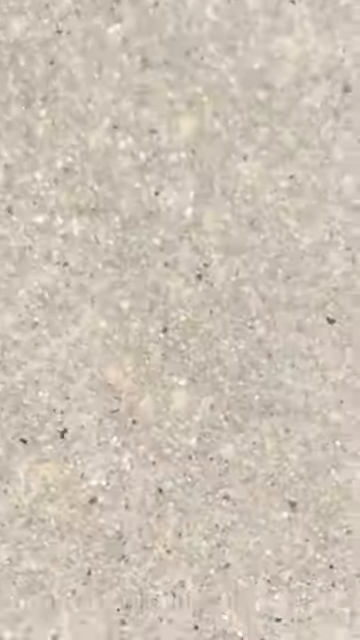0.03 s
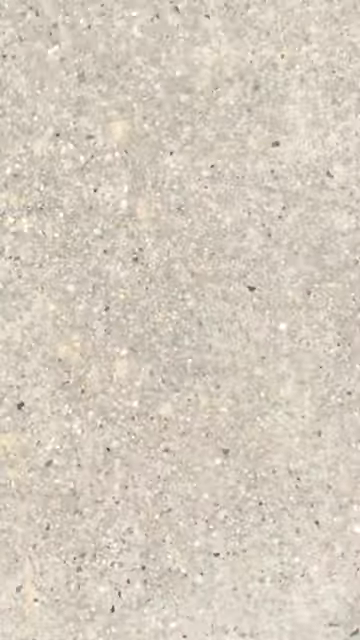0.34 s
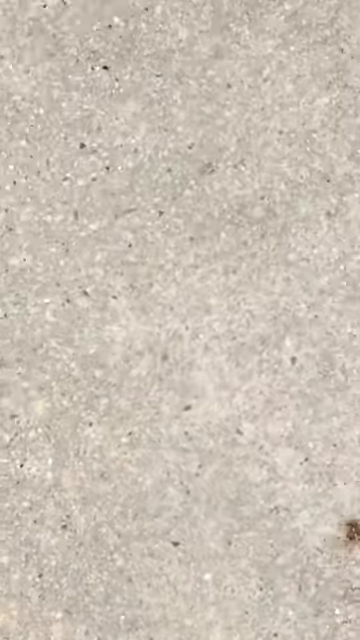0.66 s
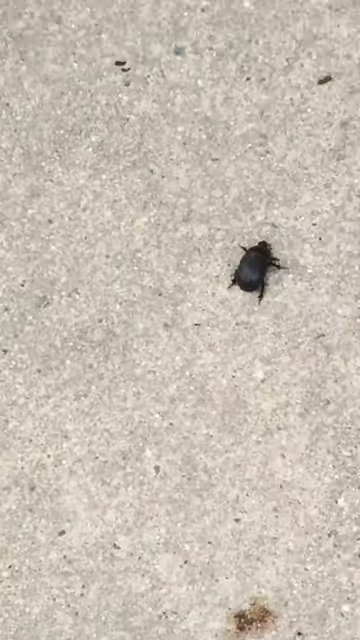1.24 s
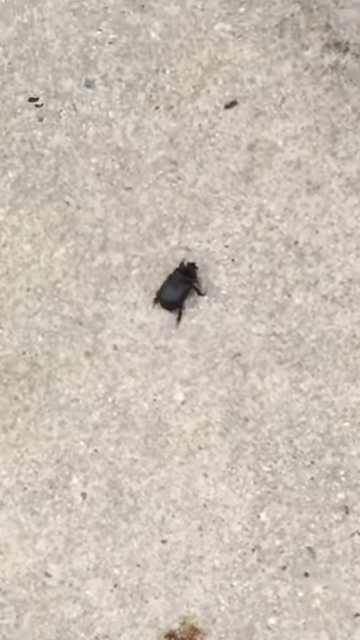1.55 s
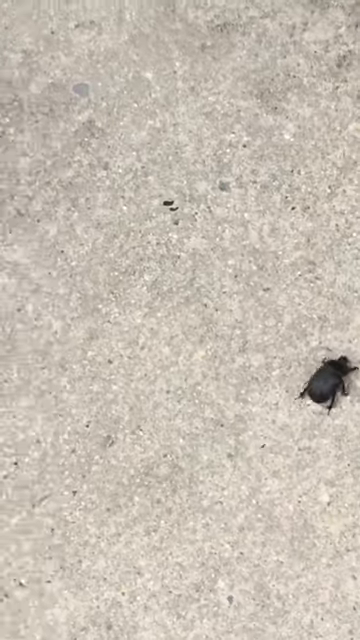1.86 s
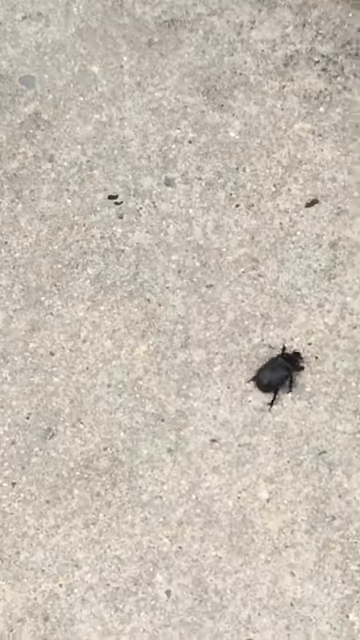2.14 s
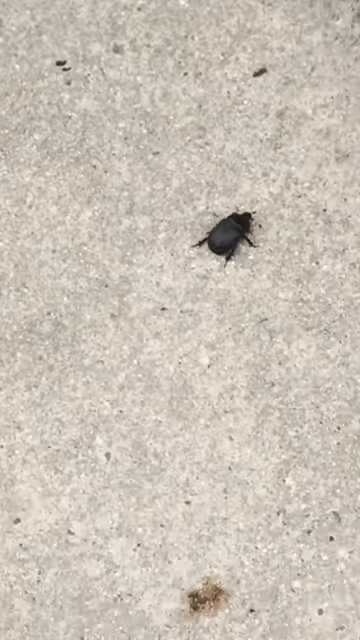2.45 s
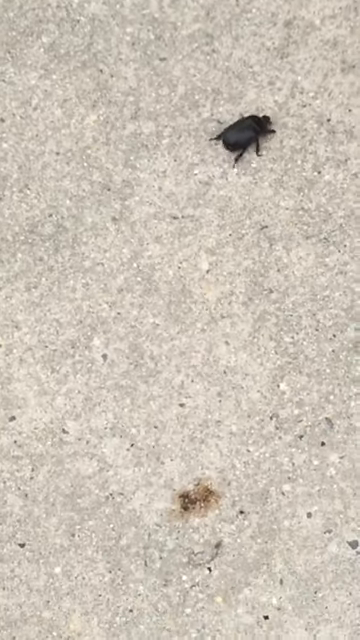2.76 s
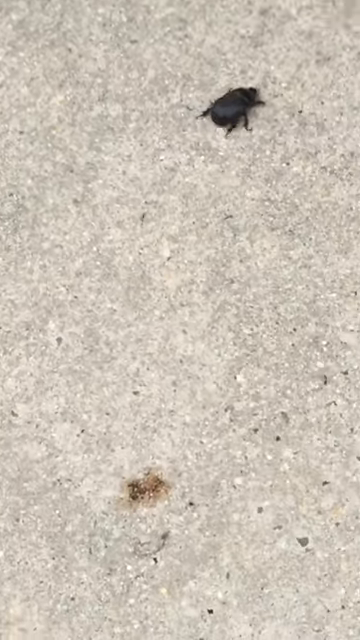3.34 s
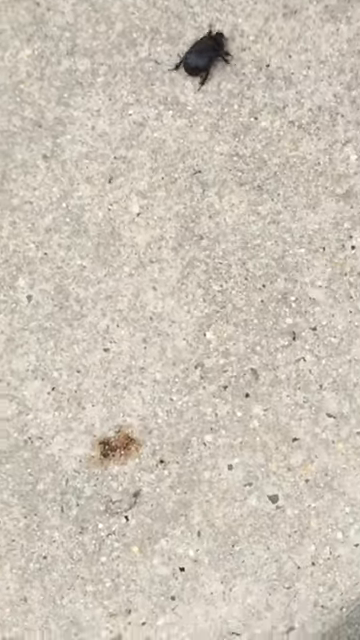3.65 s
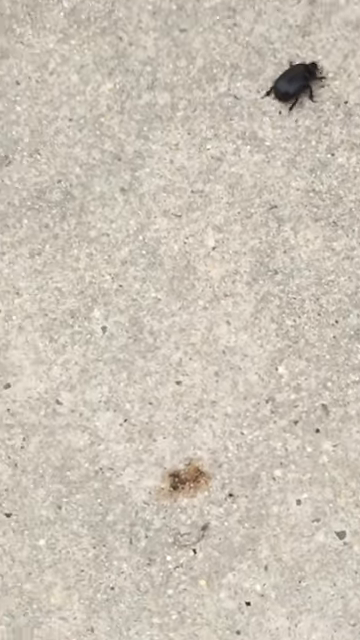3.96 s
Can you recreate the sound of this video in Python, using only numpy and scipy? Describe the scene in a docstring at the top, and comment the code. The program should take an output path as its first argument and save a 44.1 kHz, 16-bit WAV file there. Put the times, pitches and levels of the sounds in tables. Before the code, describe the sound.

A steady high insect hiss with low rumble, light microphone handling and a faint bird.

```python
"""Outdoors over a pavement, air rumbles, far machines throb (probably an idling engine and a compressor)
and a chorus of insects hisses near 6.6 kHz throughout. At the start a hand rubs and bumps the camera
while a bird whistles faintly. A few nearer insects chirp above the chorus, loudest around 2.3 s, and a
far bird peeps at 1.5 and 2.2 s. From 2.4 s the first bird twitters and whistles in turn, as the hand
rubs lightly and makes two more dry bumps, at 2.5 and 3.6 s."""
import sys
import numpy as np
from scipy import signal
from scipy.fft import rfft, irfft, next_fast_len
from scipy.io import wavfile
from scipy.ndimage import uniform_filter1d, map_coordinates

SR = 44100
rng = np.random.default_rng(int(sys.argv[2]) if len(sys.argv) > 2 else 0)


def dump(signal):
    """Clip the signal to [-1, 1] and save it as 16-bit WAV at the path in sys.argv[1]."""
    limited = np.clip(np.atleast_2d(signal).T, -1, 1)
    pcm = np.round(limited * 32767).astype(np.int16)
    wavfile.write(sys.argv[1], SR, pcm)


N = 176400
T = np.arange(N) / SR


def amp(db):
    """Turn decibels into a gain to multiply by."""
    return 10 ** (np.asarray(db) / 20)


def unit(x):
    """Scale x to an average (rms) strength of 1."""
    return x / np.sqrt(np.mean(x ** 2) + 1e-20)


def wobble(rate):
    """A smooth curve through `rate` random points a second."""
    points = rng.standard_normal(int(N * rate / SR) + 4)
    return map_coordinates(points, [T * rate], mode="nearest")


def filtered(x, response):
    """Turn each frequency in x up or down by the gain response(hz)."""
    size = next_fast_len(N + 8192)
    return irfft(rfft(x, size) * response(np.fft.rfftfreq(size, 1 / SR)), size)[:N]


def noise(spectrum, patchy_db):
    """Noise of strength 1, shaped by a spectrum, with random louder and softer patches."""
    cells = signal.stft(rng.standard_normal(N), nperseg=512)[2]
    patches = uniform_filter1d(rng.standard_normal(cells.shape), size=5, axis=0)  # smooth over pitch
    patches = uniform_filter1d(patches, size=12, axis=1)  # and over time
    patchy = signal.istft(cells * amp(patchy_db * unit(patches)), nperseg=512)[1][:N]
    f, db = np.transpose(spectrum)
    return unit(filtered(patchy, lambda hz: amp(np.interp(np.log(hz + 1), np.log(f), db))))


def add(track, s, x):
    """Mix x into the track, starting at s seconds."""
    i = max(0, round(s * SR))
    track[i:i + len(x)] += x[:max(0, N - i)]


def outdoors(x, echo_db, t60):
    """Add scattered echoes from trees and walls that fade by 60 dB in t60 seconds."""
    t = T[:SR // 2]
    tail = rng.standard_normal(len(t)) * amp(-60 * t / t60) * (1 - np.exp(-t / 0.021))
    return x + amp(echo_db) * signal.fftconvolve(x, tail / np.linalg.norm(tail))[:N]


def air():
    """The open air makes a low, nearly steady rumble."""
    # tone of the air: f/Hz, relative level/dB
    spectrum = [(15, -85), (30, -77), (55, -66.5), (90, -63), (125, -63.5), (160, -72), (220, -73),
                (275, -76.5), (345, -74.5), (440, -82.5), (620, -81.5), (800, -80), (900, -85.5),
                (1000, -84), (1170, -88.5), (1430, -86.5), (1700, -91), (2400, -95.5), (4000, -103.5),
                (5600, -106.5), (8000, -108), (9600, -113), (13500, -115), (15300, -119)]
    return amp(-42.5 + 0.39 * wobble(2.75)) * noise(spectrum, patchy_db=1.5)


def hum(hz, tones, drift, flutter_db):
    """Tones at whole multiples of one slightly unsteady rate, each wavering in level."""
    phase = 2 * np.pi * np.cumsum(hz * (1 + drift * wobble(1.995))) / SR
    out = np.zeros(N)
    for multiple, db in tones:
        level = np.sqrt(2) * amp(db + flutter_db * wobble(4.966))
        out += level * np.sin(round(multiple) * phase + rng.uniform(0, 2 * np.pi))
    return out


def machines():
    """A far engine and a compressor throb, their tones beating against each other."""
    # engine tones: multiple of the turning speed, level/dB
    engine = [(4, -54), (5, -41), (6, -49), (7, -52)]
    # compressor tones: multiple of the turning speed, level/dB
    compressor = [(4, -61), (6, -64), (8, -70.5), (14, -66.5), (18, -67), (24, -71.5)]
    compressor_hum = [(1, -50)]  # a further compressor tone near 119 Hz, same columns
    return (hum(17.5, engine, drift=0.00413, flutter_db=1.5)
            + hum(58.54, compressor, drift=0.001, flutter_db=3.5)
            + hum(119.3, compressor_hum, drift=0.001, flutter_db=3.5))


def insect_chorus():
    """Many far insects blend into one high hiss."""
    # tone of the chorus: f/Hz, relative level/dB
    spectrum = [(4500, -58), (5700, -18), (6050, -6), (6400, 3.5), (6850, 2.5), (7300, -3.5), (7800, -13.5),
                (8800, -15.5), (9500, -34), (12000, -63)]
    return amp(-62 + 1.2 * wobble(24.44)) * noise(spectrum, patchy_db=1.13)


def rub(strokes, spectrum, grain_db):
    """Friction makes grainy noise that rises and dies away with each stroke."""
    level = np.zeros(N)
    for s, rise, fall, db in strokes:
        fade = np.exp(-np.maximum(T - s - rise, 0) / fall)
        level += amp(db) * np.clip((T - s) / rise, 0, 1) * fade
    return level * unit(noise(spectrum, patchy_db=1.4) * amp(grain_db * wobble(500)))


def hand_rubbing():
    """The hand rubs the camera in four ways, each with its own tone."""
    # rasping rubs, rumbling hand shifts, dull grip scuffs, light skin brushes:
    # t/s, rise/s, fall/s, level/dB
    rasps = [(0, .004, .026, -33.5), (.528, .012, .03, -60), (1.17, .012, .035, -61), (2.83, .07, .12, -66)]
    shifts = [(.02, 0.042, 0.13, -50.5), (2.0, 0.088, 0.22, -55), (2.62, 0.13, 0.21, -49.5),
              (3.1, 0.1, 0.57, -54)]
    scuffs = [(.042, 0.0033, 0.014, -39.5), (2.66, 0.03, .1, -60), (2.78, 0.0073, .01, -52)]
    brushes = [(.83, .03, .03, -66), (2.02, 0.004, .012, -59), (2.13, 0.0081, .02, -68),
               (2.51, 0.076, .16, -62), (2.785, .01, 0.018, -67), (3.415, 0.0095, 0.017, -63)]
    # tone of each kind: f/Hz, relative level/dB
    rasp_tone = [(300, -20), (1000, -10), (2000, -15), (2900, -12), (3600, -3), (4350, 1), (5100, -6),
                 (6200, -20), (10000, -26), (15000, -33)]
    shift_tone = [(40, -28), (110, -18.5), (210, 0), (340, -3.5), (550, -21), (2000, -47)]
    scuff_tone = [(100, -37), (220, 4), (450, -14.5), (1000, 1), (2000, -13), (5000, -16.5), (15000, -28.5)]
    brush_tone = [(500, -8), (3000, 3), (7000, 2), (12500, -1), (15000, -4)]
    return (rub(rasps, rasp_tone, grain_db=1) + rub(shifts, shift_tone, grain_db=0.5)
            + rub(scuffs, scuff_tone, grain_db=3.5) + rub(brushes, brush_tone, grain_db=1))


def sing(notes, calls):
    """A bird's pure notes each swell and fade while the pitch slides along a curve."""
    out = np.zeros(N)
    for s, db, ratio, swell in calls:
        for delay, length, start, middle, end, note_db in notes:
            progress = np.linspace(0, 1, int(length * SR))
            slide = np.polyfit([0, .5, 1], [start, middle, end], 2)
            hz = ratio * np.polyval(slide, progress)
            level = amp(db + note_db + swell * delay) * np.sqrt(2) * np.sin(np.pi * progress)
            add(out, s + delay, level * np.sin(2 * np.pi * np.cumsum(hz) / SR))
    flicker = amp(2.75 * wobble(130))
    return outdoors(out * flicker, echo_db=-13, t60=0.25)


def birds():
    """One bird whistles and twitters; a farther one peeps."""
    # notes of each call: delay/s, length/s, start f/Hz, middle f/Hz, end f/Hz, relative level/dB
    whistle = [(0, 0.08, 3910, 3640, 3470, -6), (.077, 0.046, 3350, 2930, 2740, -1.5),
               (.162, 0.041, 2690, 2520, 2350, -10.5), (.17, 0.13, 2400, 2313, 2340, -7)]
    peep = [(0, .06, 2130, 2160, 2120, 0)]
    twitter = [(0, .018, 4130, 3020, 2630, -0.5), (.028, 0.02, 3300, 2850, 2680, -3),
               (.055, .045, 3150, 3090, 4090, 0.5)]
    # when each is sung: t/s, level/dB, pitch ratio, swell from note to note/(dB per s)
    whistle_calls = [(0.073, -59.5, 1.018, 75), (2.62, -49, 1.003, -6), (3.193, -47, 0.999, -15)]
    peep_calls = [(1.5, -60.5, 1.0, 0), (2.16, -63, .95, 0)]
    twitter_calls = [(2.409, -65, 1.0, 110), (2.965, -55.5, 1.0, 22), (3.556, -55, 0.96, 18)]
    return sing(whistle, whistle_calls) + sing(peep, peep_calls) + sing(twitter, twitter_calls)


def bumps():
    """A soft push makes the camera body ring for a few milliseconds, with a tiny tick of contact."""
    # pushes: t/s, knock peak/dB, muffled above f/Hz, pitch ratio, tick against knock/dB, tick f/Hz
    pushes = [(0.1688, -16.5, 800, 0.81, -16.5, 6200), (2.4736, -17, 2110, 1.06, -24, 5500),
              (3.6171, -14, 1640, 1.05, -11.5, 4220)]
    # ringing tones of the body: f/Hz, relative level/dB, time to fade by 60 dB/s
    body = [(397, -19, 0.017), (576, -7.5, 0.013), (761, 8.5, 0.0088), (1160, 4.5, 0.0021),
            (1650, 1, 0.0038)]
    tick_t60, rise_cycles = 0.00063, 1.1  # the tick's fade in seconds and build-up in cycles
    out, t = np.zeros(N), T[:SR // 20]
    for s, db, soft_hz, ratio, tick_db, tick_hz in pushes:
        ring = sum(amp(level - 60 * t / t60) * np.cos(2 * np.pi * ratio * hz * t)
                   for hz, level, t60 in body)
        knock = signal.sosfilt(signal.butter(4, soft_hz, fs=SR, output="sos"), ring)
        tick_rise = 1 - np.exp(-t * tick_hz / rise_cycles)
        tick = tick_rise * amp(-60 * t / tick_t60) * np.sin(2 * np.pi * tick_hz * t)
        bump = knock / np.abs(knock).max() + amp(tick_db) * tick / np.abs(tick).max()
        add(out, s, amp(db) * bump)
    return outdoors(out, echo_db=-21.5, t60=0.033)


def near_insects():
    """Single insects chirp in pulses of high, narrow hiss that slowly grow louder, then fade."""
    # insects: f/Hz, width/Hz, one chirp at t/s, period/s, chirp length/s, loudest at t/s,
    # fade time/s, level/dB
    chirpers = [(8780, 460, .93, .22, 0.059, 2.3, 1.6, -72.5), (8330, 330, 1.14, 0.35, 0.11, 2.4, 1.1, -74),
                (7730, 300, 1.8, .06, 0.036, 2.2, .6, -71)]
    out = np.zeros(N)
    for hz, width, chirp_at, period, length, loudest_at, fade, db in chirpers:
        hiss = unit(filtered(rng.standard_normal(N), lambda f: np.exp(-2 * ((f - hz) / width) ** 2)))
        uneven_time = T + .008 * wobble(6.3)
        from_chirp = (uneven_time - chirp_at + period / 2) % period - period / 2
        pulses = np.exp(-(2 * from_chirp / length) ** 4)
        swell = np.exp(-.5 * ((T - loudest_at) / fade) ** 2)
        out += amp(db + .8 * wobble(12)) * hiss * pulses * swell
    return out


def scene():
    """Mix the outdoor sounds and the close hand sounds into one channel."""
    background = air() + machines() + insect_chorus()
    return (background + hand_rubbing() + birds() + bumps() + near_insects())[None]


def record(dry):
    """The camera keeps nothing above its highest frequency."""
    top_hz = 15330
    return np.array([filtered(x, lambda hz: hz < top_hz) for x in dry])


dry = scene()
out = record(dry)
dump(out)
```